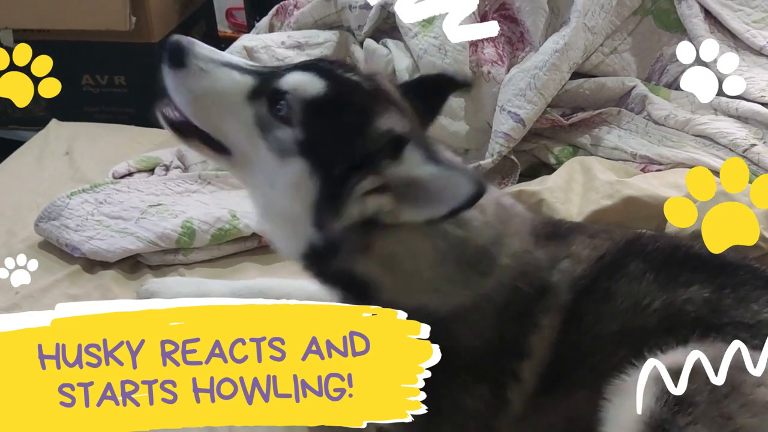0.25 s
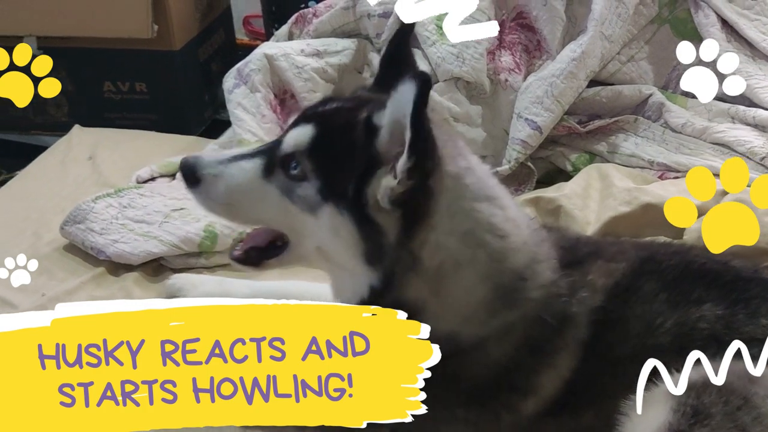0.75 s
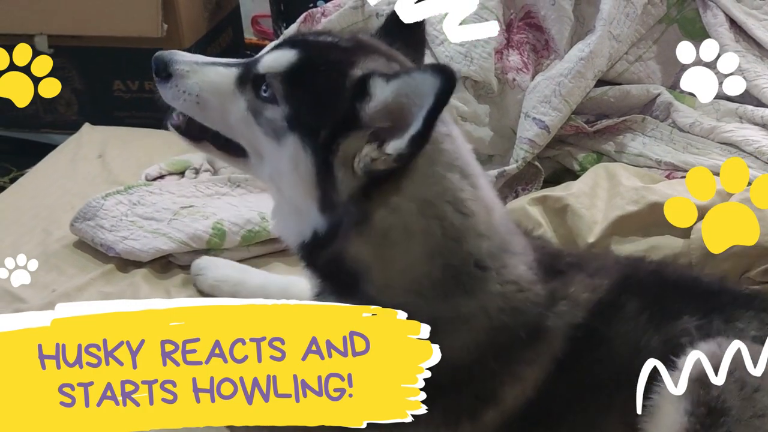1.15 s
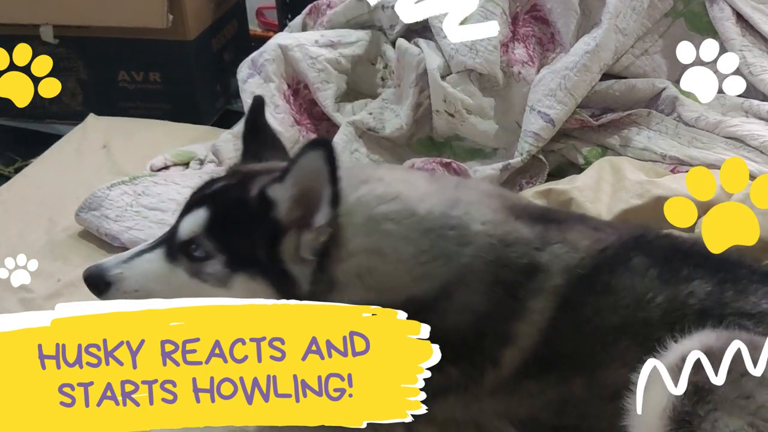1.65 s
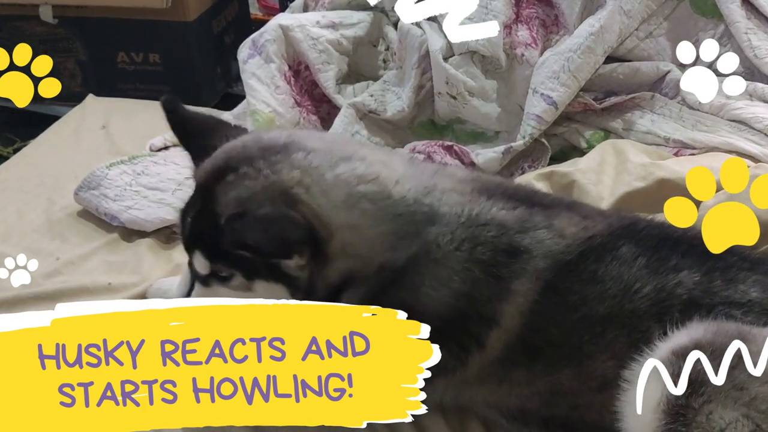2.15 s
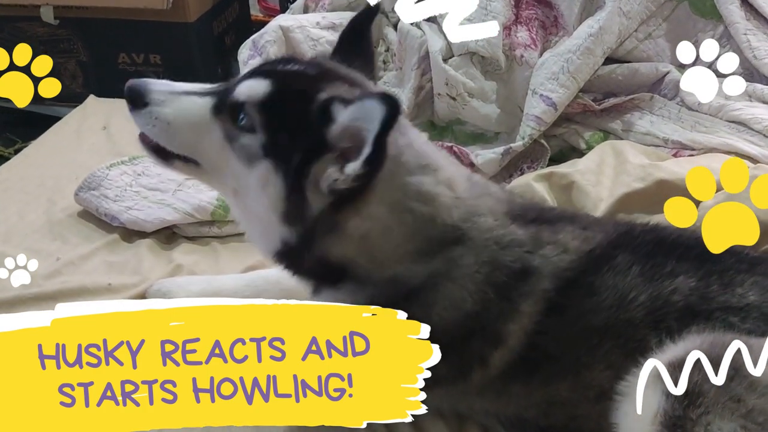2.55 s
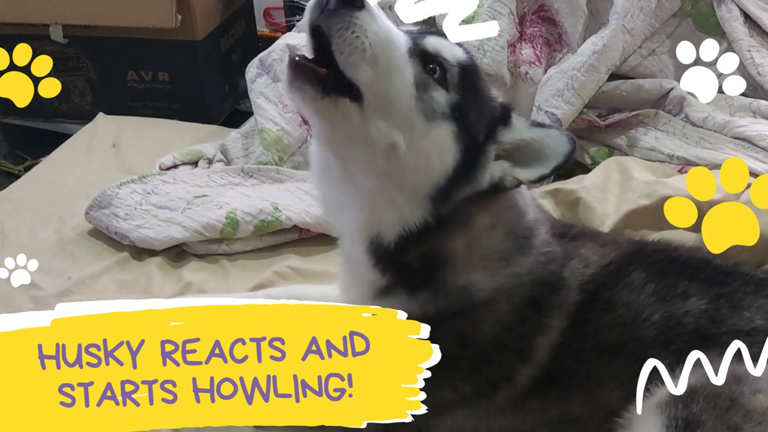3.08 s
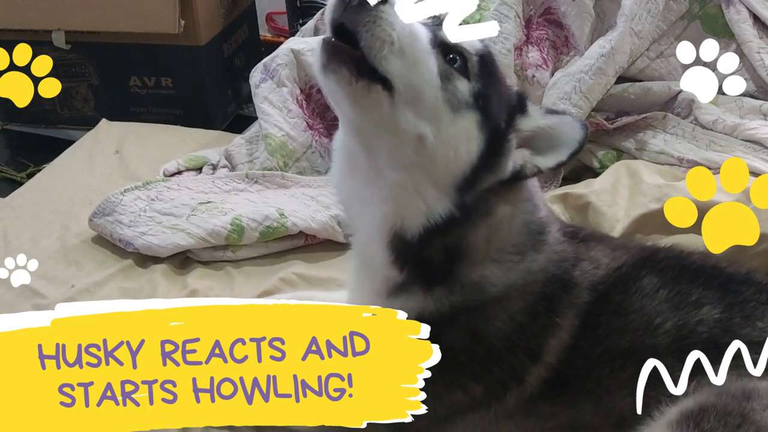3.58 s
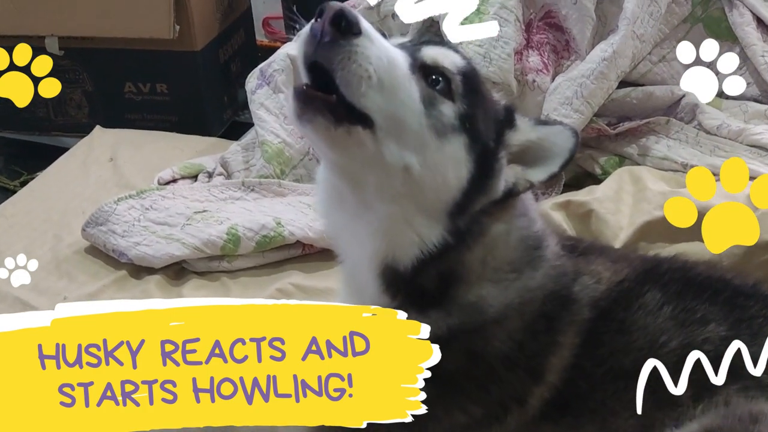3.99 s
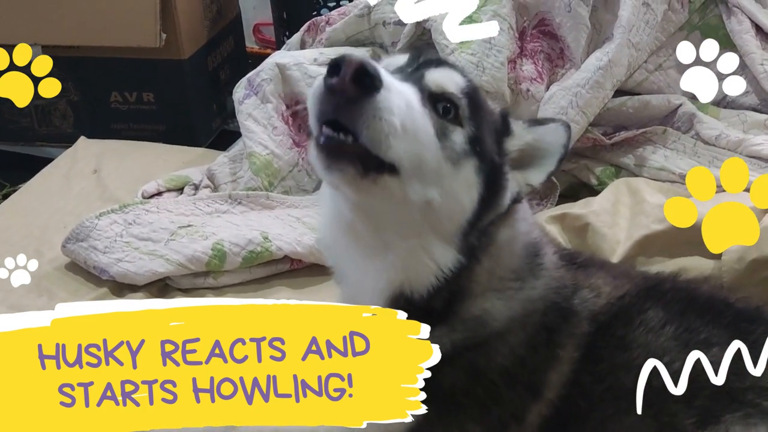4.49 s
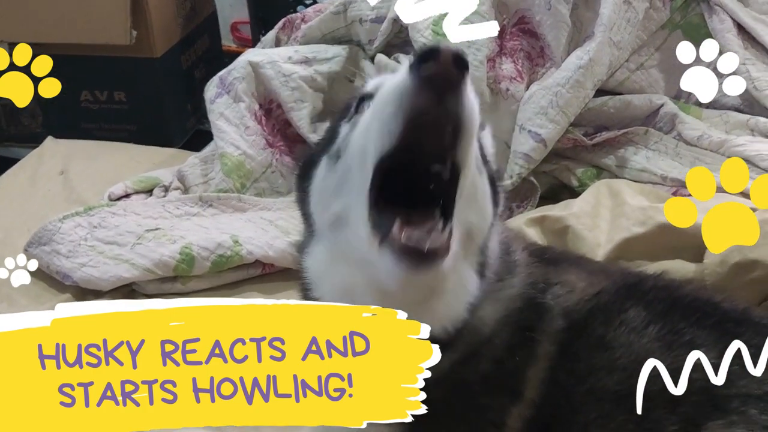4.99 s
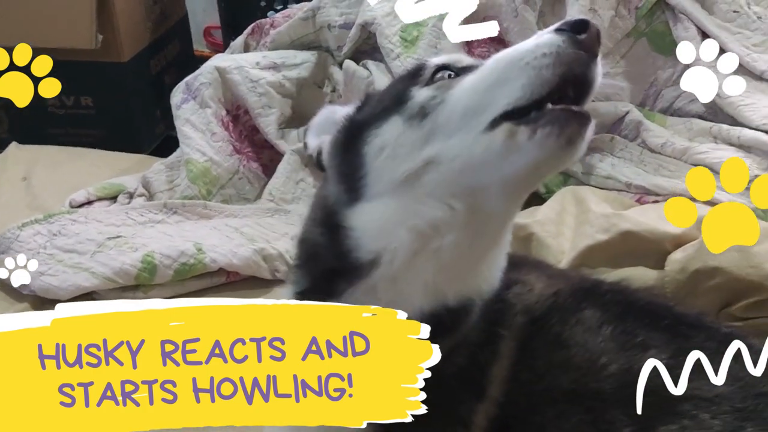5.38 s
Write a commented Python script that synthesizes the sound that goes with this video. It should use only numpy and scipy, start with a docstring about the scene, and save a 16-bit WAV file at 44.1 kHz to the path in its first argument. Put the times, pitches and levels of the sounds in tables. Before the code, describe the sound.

A young dog yaps twice, then howls in long bending, sometimes raspy notes while a squeaky toy squeaks beside it indoors.

```python
"""Puppy howling at a squeaky toy

A husky puppy yaps twice, then howls in long bending notes that turn rough and split into two pitches.
A squeaky toy eggs it on: the reed sounds low on each squeeze and an octave higher as the air returns.
Both are close to a pair of microphones; a small furnished room answers, over a faint rumble.
Voice and toy are sums of harmonics with coloured noise for air; dull thuds are damped sines.
"""
import sys
import numpy as np
from scipy import signal
from scipy.fft import rfft, irfft, next_fast_len
from scipy.io import wavfile
from scipy.ndimage import uniform_filter1d, minimum_filter1d, map_coordinates

SR = 44100
rng = np.random.default_rng(int(sys.argv[2]) if len(sys.argv) > 2 else 0)


def wav_out(sig):
    """Save sig, one row per channel (or a flat mono array), as 16-bit PCM at SR to the path in sys.argv[1]."""
    wavfile.write(sys.argv[1], SR, np.round(np.clip(np.atleast_2d(sig).T, -1, 1) * 32767).astype(np.int16))


N = 248724
TIME = np.arange(N) / SR  # s

# Source levels are relative: placing the dog and the toy in the room sets their final balance.
# The toy squeezed: [start t/s, length t/s, settled pitch f/Hz, pitch surge f/Hz, time to the surge t/s,
# starting level/dB, fading dB/s]
SQUEEZES = [(0.78, 0.48, 803.8, 25.72, 0.067, -15.5, 24.5), (2.231, 0.54, 784, 78, 0.071, -18.5, 6.5),
            (3.823, .58, 801.3, 41.37, .06, -17.5, 14.5), (5.423, 0.26, 797.7, 42.6, 0.064, -20.5, -1)]


def amp(db):
    """Decibels to gain."""
    return 10 ** (np.asarray(db) / 20)


def unit(x):
    """Scale to rms 1."""
    return x / np.sqrt(np.mean(x ** 2) + 1e-20)


def along(points, hz):
    """Read (f/Hz, value) points on a log frequency axis."""
    f, value = np.transpose(points)
    return np.interp(np.log(np.abs(hz) + 1), np.log(f + 1), value)


def curves(rows):
    """One value per sample for each column after the time."""
    s, *columns = np.transpose(rows)
    return [np.interp(TIME, s, column) for column in columns]


def phrases(tables, fade):
    """A gate that opens and closes smoothly around each table, then the joined columns."""
    gate = np.zeros(N)
    for rows in tables:
        to_nearest_end = np.minimum(TIME - rows[0][0], rows[-1][0] - TIME)
        gate += np.clip(to_nearest_end / fade + .5, 0, 1)
    smooth_gate = np.sin(np.pi / 2 * np.minimum(gate, 1)) ** 2
    return [smooth_gate] + curves(np.vstack(tables))


def events(rows, fade):
    """For each sample: a gate, the time into the current event, its length and its other columns."""
    rows = np.array(rows)
    current = np.maximum(np.searchsorted(rows[:, 0] - fade, TIME) - 1, 0)
    start, length, *columns = rows[current].T
    t = TIME - start
    gate = np.sin(np.pi / 2 * np.clip(np.minimum(t, length - t) / fade + .5, 0, 1)) ** 2
    return [gate, np.clip(t, 0, length), length] + columns


def bell(x, width):
    """A smooth hump of height 1 around x = 0."""
    return np.exp(-(x / width) ** 2)


def wobble(rate):
    """A smooth random curve, rate knots a second."""
    knots = rng.standard_normal(int(N * rate / SR) + 4)
    return map_coordinates(knots, [TIME * rate])


def filtered(x, response):
    """x times a response of frequency."""
    m = next_fast_len(N + SR // 2)  # spare length keeps the end from wrapping onto the start
    spectrum = rfft(x, m) * response(np.fft.rfftfreq(m, 1 / SR))
    return irfft(spectrum, m)[..., :N]


def noise(spectrum):
    """Coloured noise of rms 1."""
    return unit(filtered(rng.standard_normal(N), lambda hz: amp(along(spectrum, hz))))


def cycle(hz):
    """Running phase of an oscillator."""
    return 2 * np.pi * np.cumsum(hz) / SR


def floor(shared_db=-51, apart_db=-55):
    """Quiet room rumble, mostly alike at both microphones."""
    # colour of the rumble: [f/Hz, level/dB]
    rumble = [(20, -2.5), (80, -6.5), (115, 6.5), (160, -7.5), (800, -11.5), (2000, -16.5), (6000, -18),
              (15000, -40.5)]
    apart = np.array([noise(rumble), noise(rumble)])
    return amp(shared_db) * noise(rumble) + amp(apart_db) * apart


def reed(pitch, db, tone, jitter, count, unsteady_db=4.0):
    """A buzzing reed in a short pipe: harmonics on a slightly unsteady flow of air."""
    phase = cycle(pitch * (1 + jitter * wobble(100)))
    buzz = sum(amp(along(tone, k * pitch)) * np.sin(k * phase) for k in range(1, count + 1))
    return np.sqrt(2) * amp(db + unsteady_db * wobble(12)) * buzz


def refills(sag=0.094, stall_s=0.035, low_hz=790, low_db=-43, low_s=.055, low_after_s=0.02):
    """Returning air swells twice; as it runs out the reed sags, beats irregularly and falls to its low note."""
    # the toy refilling: [start t/s, length t/s, pitch before swells and sag f/Hz, first swell f/Hz,
    # second swell f/Hz, level before swells/dB]
    strokes = [(-.45, .575, 1554, 50, 70.2, -24), (1.334, .565, 1550, 39.24, 72.03, -24.5),
               (2.891, .75, 1515, 88, 55, -27.5), (4.603, 0.58, 1569, 125.6, 82.3, -25.5)]
    # strength of the reed's harmonics by frequency: [f/Hz, level/dB]
    tone = [(1600, -16.5), (3200, -8.5), (4750, -1.5), (6300, -15), (7900, -18.5), (9500, -34),
            (14000, -72)]
    gate, t, length, hz, first_hz, second_hz, db = events(strokes, fade=.012)
    # the walls spring back in two moves, placed by share of the stroke
    first = bell(t / length - 0.11, .16)
    second = bell(t / length - .78, .18)
    stall = sag * bell(length - t, stall_s) * (1 + wobble(400) / 2)
    pitch = (hz + first_hz * first + second_hz * second) * (1 - stall)
    level_db = db + 3 * first + 2.5 * second
    high = reed(pitch, level_db, tone, jitter=0.0038, count=7)
    low = sum(bell(TIME - row[0] - row[1] - low_after_s, low_s) for row in strokes)
    return gate * high + amp(low_db) * low * np.sin(2 * np.pi * low_hz * TIME)


def squeezes(surge_sharpness=1.6):
    """The hand's first push drives the pitch up; then it settles while the level drifts, mostly fading."""
    # strength of the reed's harmonics by frequency: [f/Hz, level/dB]
    tone = [(1650, -30.5), (2450, -20), (3250, -21.5), (4100, 1.5), (4900, -11), (5700, -11.5),
            (6500, -24.5), (7400, -28), (10500, -37), (13000, -87.5)]
    gate, t, length, hz, surge_hz, surge_s, db, fading = events(SQUEEZES, fade=0.018)
    # a greater sharpness makes the peak briefer
    surge = (t / surge_s * np.exp(1 - t / surge_s)) ** surge_sharpness
    return gate * reed(hz + surge_hz * surge, db - fading * t, tone, jitter=0.0031, count=14)


def toy(spit_t60=0.057, spit_rise=.01, leak_db=-40, leak_rise=0.34):
    """The squeaker sounds on the way out and on the way in, spitting air at the turns."""
    # air spits through the reed as it catches or stalls: [t/s, level/dB]
    bursts = [(0.089, -21.5), (0.785, -15.5), (1.218, -15), (1.862, -27), (2.235, -16.5), (2.78, -17),
              (3.614, -19.5), (3.826, -16.5), (4.38, -15.5)]
    # colour of air through the reed: [f/Hz, level/dB]
    nozzle = [(700, -22), (3400, -14), (4200, -3.5), (4800, -17), (5800, -22), (8000, -29.5),
              (12000, -49.5)]
    spits = np.zeros(N)
    for s, db in bursts:
        onset = np.clip((TIME - s) / spit_rise, 0, 1)
        spits += onset * amp(db - 60 * np.abs(TIME - s) / spit_t60)
    # air leaks with growing force before the reed catches, then dies away: 30 dB per leak_rise
    leaks = sum(amp(leak_db - 60 * np.abs(TIME - row[0]) / (2 * leak_rise)) for row in SQUEEZES)
    return squeezes() + refills() + (spits + leaks) * noise(nozzle)


def yaps(first_rough=0.24, droop=.2, edge_db=-11.5, overtones_db=-9.5):
    """Pitch and level arch over each yap, rougher up to the top: gate, pitch, level, mouth, overtones, roughness."""
    # yaps: [start t/s, length t/s, top pitch f/Hz, share of the length at which the pitch tops,
    # top level/dB, mouth opening 0-1, roughness from the top on 0-1]
    barks = [(.299, .125, 1047, .62, -10.5, 0.67, 0.49), (.938, .168, 503.1, .42, -15.5, 0.38, 0.82)]
    gate, t, length, hz, top_at, db, mouth, rough = events(barks, fade=.005)
    u = t / length
    # 0 at the top of the arch, 1 at either end
    edge = np.where(u < top_at, (top_at - u) / top_at, (u - top_at) / (1 - top_at)) ** 2
    pitch = hz * (1 - droop * np.sin(np.pi / 2 * edge))
    growth = first_rough + (1 - first_rough) * np.minimum(u / top_at, 1)
    return gate, pitch, db + edge_db * edge, mouth, np.full(N, overtones_db), rough * growth


def howls(clear_roughness=0.069):
    """Long bending notes, clear but for a few rasps: gate, pitch, level, mouth, overtones, roughness."""
    # pitch of each howl, with sudden breaks between registers: [t/s, f/Hz]
    notes = [
        [(2.385, 335), (2.41, 426), (2.46, 560), (2.5, 704), (2.6, 930), (2.66, 920), (2.715, 750),
         (2.735, 935), (2.78, 945), (3.01, 730), (3.12, 840), (3.25, 878), (3.58, 832), (3.755, 783),
         (3.772, 690), (3.89, 645), (3.925, 555), (4.07, 511), (4.39, 497), (4.53, 505), (4.562, 700)],
        [(4.72, 415), (4.8, 430), (4.95, 560), (5.055, 568)],
        [(5.075, 385), (5.1, 402), (5.157, 690), (5.172, 868), (5.207, 848), (5.225, 975), (5.315, 920),
         (5.39, 960), (5.66, 950)],
    ]
    # how hard and openly each howl is sung: [t/s, level/dB, mouth opening 0-1,
    # overtones near 2.5 kHz over the level/dB]
    effort = [
        [(2.385, -27, 0.28, -12.5), (2.47, -27, 0, -5), (2.55, -8.5, .2, -13.5), (2.7, -8.5, .3, -19.5),
         (2.8, -25, 0.37, -20.5), (3.02, -14, .2, -21.5), (3.21, -11.5, .3, -25), (3.29, -19.5, .4, -18),
         (3.62, -11, 0.32, -29), (3.78, -16.5, 0.6, -30.5), (3.93, -5, .05, -32), (4.2, -9, 0.13, -25.5),
         (4.39, -9.5, 0.08, -38.5), (4.56, -23, 0.17, -26.5)],
        [(4.72, -39, 0.26, -8), (4.95, -41.5, 0.26, -5.5), (5.055, -36.5, 0.4, -13.5)],
        [(5.075, -24.5, 0.23, -15.5), (5.097, -12, 0.42, -12.5), (5.16, -6.5, 0.56, -13),
         (5.27, -17, 0.84, -15), (5.39, -9, 0.87, -18), (5.52, -14.5, 0.89, -15), (5.64, -11, 1, -7.5)],
    ]
    # the vocal folds turn irregular: [middle t/s, half length t/s, added roughness 0-1]
    rasps = [(2.425, 0.067, .26), (2.719, 0.034, .2), (2.868, .11, 0.63), (3.502, 0.073, .33),
             (3.787, 0.033, 0.17), (5.201, 0.11, 0.36)]
    gate, pitch = phrases(notes, fade=0.0029)
    db, mouth, overtones_db = curves(np.vstack(effort))
    rough = clear_roughness + sum(peak * bell(TIME - s, width) for s, width, peak in rasps)
    return gate, pitch, db, mouth, overtones_db, rough


def harmonics(pitch, db, mouth, overtones_db, rough, flicker_db=2.5):
    """Levels of fundamental, second harmonic and overtones: an opening mouth shifts the strength upward."""
    closed_hz, open_hz, below_db_per_oct = 478, 1186, 33.5
    second_over_first_db, second_rough_db = -10.5, 8  # the latter is the gain at full roughness
    resonance = closed_hz + (open_hz - closed_hz) * mouth
    balance = second_over_first_db + second_rough_db * np.minimum(rough, 1)
    # a fundamental under the mouth resonance loses strength
    balance += below_db_per_oct * np.log2(np.maximum(resonance / pitch, 1))
    balance += flicker_db * wobble(20)
    # the two harmonics together carry the power of the level
    first_db = db - 10 * np.log10(1 + amp(balance) ** 2)
    return first_db, first_db + balance, db + overtones_db + flicker_db * wobble(25)


def dog(jitter=.003, waver=0.0295, scatter=0.73, shimmer=0.72, growl_db=-12, hiss_db=-9,
        overtone_db=-3, spread=1.0, overtone_hz=2500, usual_hz=650, patchy_db=3):
    """Vocal folds sound through the throat; rough stretches scatter their cycles and add noise."""
    # a second oscillation in the larynx: [start t/s, length t/s, f/Hz, level before mixing/dB]
    splits = [(.36, 0.062, 382.4, -22), (2.79, 0.18, 637.5, -21), (3.26, 0.32, 579.2, -17.5),
              (3.76, .09, 543.3, -25.5)]
    # tones born of the two oscillations: [multiple of the pitch, multiple of the second oscillation, level/dB]
    mixes = [(0, 1, -1.5), (1, 1, 0), (2, -1, -9.5), (3, -1, -28)]
    # throat response: [f/Hz, gain/dB]
    throat = [(330, -56), (520, -4), (1100, 2.5), (1450, 0.5), (2000, 3.5), (2880, -4.5), (3500, -8),
              (5500, -18), (9000, -51), (15000, -46.5)]
    # low throat noise: [f/Hz, level/dB]
    growl = [(300, -37), (450, -6.5), (650, 11), (1450, 2), (1900, -9), (3000, -34.5)]
    # mouth noise: [f/Hz, level/dB]
    hiss = [(1000, -36.5), (2000, 1), (3000, 2), (4200, -13), (7000, -12), (11000, -12), (15000, -51.5)]
    yap = yaps()
    gate, pitch, db, mouth, overtones_db, rough = np.where(yap[0] > 0, yap, howls())
    first_db, second_db, top_db = harmonics(pitch, db, mouth, overtones_db, rough)
    unsteadiness = jitter + waver * rough
    phase = cycle(pitch * (1 + unsteadiness * wobble(90))) + scatter * rough * wobble(320)
    voice = amp(first_db) * np.sin(phase) + amp(second_db) * np.sin(2 * phase)
    # widely spaced overtones each carry more of the treble
    spacing_db = overtone_db + spread * 10 * np.log10(pitch / usual_hz)
    octave_span = np.log(np.maximum(overtone_hz / (2 * pitch), 1.05))
    for k in range(3, 13):
        # overtones slope from the second harmonic to the top level, then follow the throat
        climb = np.clip(np.log(k / 2) / octave_span, 0, 1)
        level = second_db + climb * (top_db + spacing_db - second_db) + along(throat, k * pitch)
        voice += amp(level + patchy_db * wobble(22.08)) * np.sin(k * phase)
    # the second oscillation swells, fades and adds sum and difference tones
    split, t, length, split_hz, split_db = events(splits, fade=0.0069)
    split = split * np.abs(np.sin(np.pi * t / length)) ** 0.26
    other = cycle(split_hz * (1 + unsteadiness * wobble(70)))
    for m, n, mix_db in mixes:
        level = split_db + mix_db + along(throat, m * pitch + n * split_hz)
        voice += split * amp(level) * np.sin(m * phase + n * other)
    voice *= np.sqrt(2) * (1 + shimmer * rough * wobble(180))
    # turbulence grows with effort and roughness
    air = rough * (amp(db + growl_db) * noise(growl) + amp(top_db + hiss_db) * noise(hiss))
    return gate * (voice + air)


def thuds(t60=0.08, rise=0.0022):
    """A dull, quickly damped push goes with each lunge of the head."""
    # soft low thuds: [t/s, f/Hz, level/dB]
    pushes = [(0.433, 101, -23), (1.088, 124, -17.5), (2.374, 222, -20)]
    out = np.zeros(N)
    for s, hz, db in pushes:
        t = np.maximum(TIME - s, 0)
        out += amp(db - 60 * t / t60) * (1 - np.exp(-t / rise)) * np.sin(2 * np.pi * hz * t)
    return out


def placed(x, lead_ms, pan_db, wet_db):
    """The direct sound reaches the left microphone first; the room adds a diffuse tail to each side."""
    # reverberation time of the furnished room: [f/Hz, t60 t/s]
    room_t60 = [(150, 0.97), (600, 0.4), (1500, 0.47), (4500, 0.51), (9000, 0.29), (15000, 0.06)]
    side = np.array([[1], [-1]]) / 2  # left, right
    direct = filtered(x, lambda hz: np.exp(2j * np.pi * hz * side * lead_ms / 10 ** 3))
    # the tail is noise that dies away at its own rate in each band
    hz, t, z = signal.stft(rng.standard_normal((2, SR // 2)), SR, nperseg=256)
    decay = amp(-60 * t / along(room_t60, hz)[:, None]) * (1 - np.exp(-t / 0.0025))
    tail = signal.istft(z * decay, SR, nperseg=256)[1]
    room = signal.fftconvolve(x[None], tail / np.linalg.norm(tail[0]), axes=1)[:, :N]
    return amp(side * pan_db) * (direct + amp(wet_db) * room)


def scene():
    """Dog and toy close to the microphones in one room, with dry thuds and the rumble."""
    puppy = amp(1.5) * placed(dog(), lead_ms=0.15, pan_db=1.5, wet_db=-3.5)
    squeaker = amp(-1) * placed(toy(), lead_ms=.17, pan_db=-1, wet_db=1)
    return puppy + squeaker + thuds() + floor()


def record(dry, top_hz=15800):
    """A limiter holds the highest peaks on both sides alike; nothing is kept above the band limit."""
    needed = np.minimum(1, .95 / (np.abs(dry).max(axis=0) + 1e-9))
    gain = uniform_filter1d(minimum_filter1d(needed, size=900), size=800)
    return filtered(dry * gain, lambda hz: hz < top_hz)


dry = scene()
out = record(dry)
wav_out(out)
```